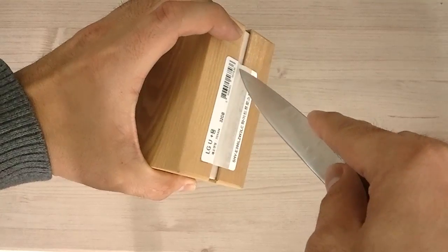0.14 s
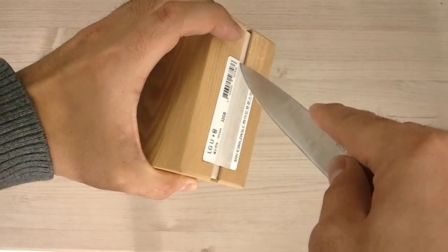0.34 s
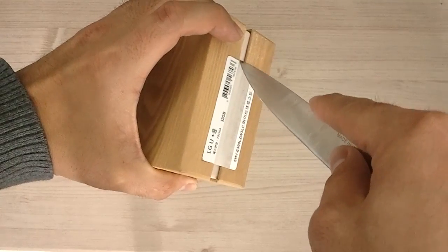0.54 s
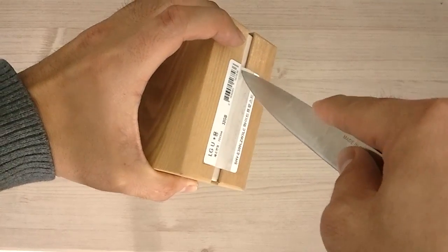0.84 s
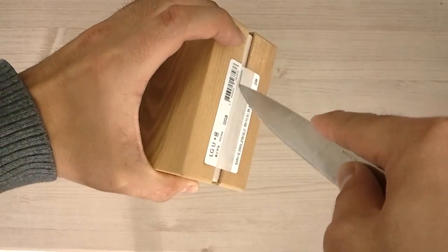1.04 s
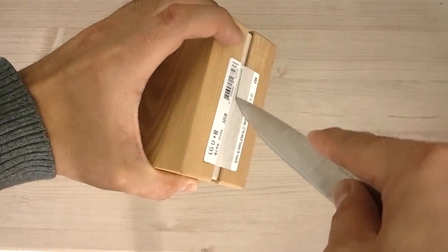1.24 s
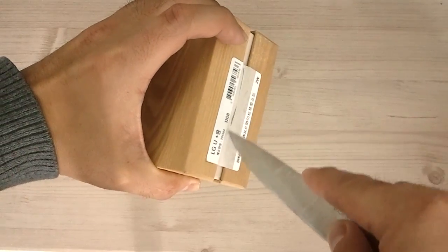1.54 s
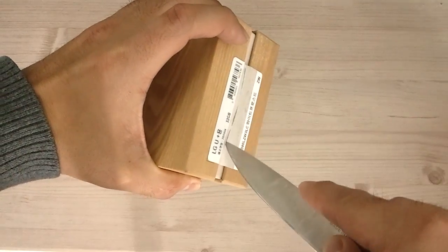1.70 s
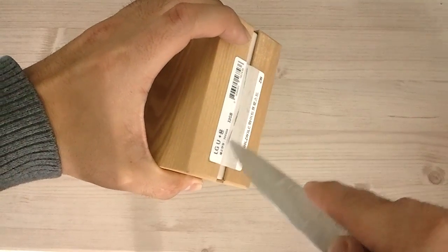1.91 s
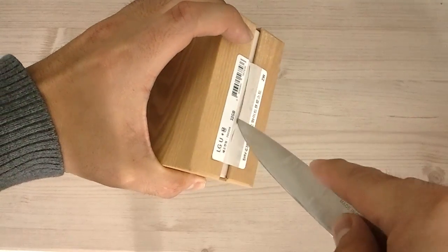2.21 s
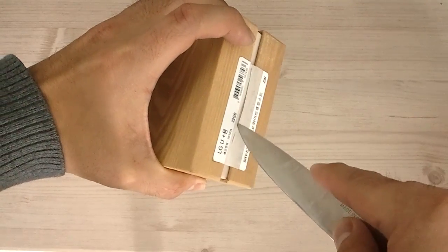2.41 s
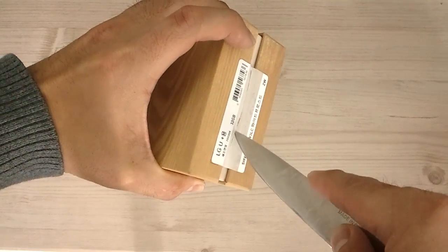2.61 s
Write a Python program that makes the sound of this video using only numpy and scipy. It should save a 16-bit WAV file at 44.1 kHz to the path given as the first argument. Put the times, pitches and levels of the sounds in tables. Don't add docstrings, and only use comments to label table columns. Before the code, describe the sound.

A knife tip slits a paper seal on a small wooden box, ticking, scraping and thumping the table

```python
import sys
import numpy as np
from scipy import signal
from scipy.fft import rfft, irfft, next_fast_len
from scipy.io import wavfile
from scipy.ndimage import uniform_filter1d, map_coordinates

SR = 44100
rng = np.random.default_rng(int(sys.argv[2]) if len(sys.argv) > 2 else 0)


def convert_level_to_amplitude(level_db):
    exponent = np.asarray(level_db, float) / 20
    return 10 ** exponent


def bounce(signal):
    frames = np.transpose(np.atleast_2d(signal))
    limited = np.clip(frames, -1, 1)
    pcm = np.round(limited * 32767).astype(np.int16)
    wavfile.write(sys.argv[1], SR, pcm)


N = 121275
HALF = SR // 40
WINDOW_HZ = np.fft.rfftfreq(2 * HALF, 1 / SR)


def along(points, hz):
    f, v = np.transpose(points)
    return np.interp(np.log(hz + 1), np.log(f + 1), v)


def unit(x):
    return x / np.sqrt(np.mean(x ** 2) + 1e-20)


def wobble(rate):
    knots = rng.standard_normal(int(N * rate / SR) + 4)
    return map_coordinates(knots, [np.arange(N) * rate / SR])


def filtered(x, response):
    m = next_fast_len(N + SR)
    return irfft(rfft(x, m) * response(np.fft.rfftfreq(m, 1 / SR)), m)[..., :N]


def coloured(x, points):
    cepstrum = irfft(np.log(convert_level_to_amplitude(along(points, np.fft.rfftfreq(4096, 1 / SR))) + 1e-6))
    cepstrum[1:2048] *= 2
    cepstrum[2049:] = 0
    h = irfft(np.exp(rfft(cepstrum)))[:1024]
    return signal.fftconvolve(x, h / np.linalg.norm(h))[:N]


def ringing(x, modes):
    def response(f):
        total = 0
        for k, (centre, width, db) in enumerate(modes):
            damping = 1j * f * width
            total = total + (-1) ** k * convert_level_to_amplitude(db) * damping / (centre * centre - f * f + damping)
        return total / np.sqrt(np.mean(abs(total) ** 2))
    return filtered(x, response)


def knife():
    drag, drag_in_box = strokes()
    tear, tear_in_steel, tear_in_box = tears()
    drag_rings_db = -9
    air = drag + tear
    steel = drag * convert_level_to_amplitude(drag_rings_db) + tear_in_steel
    return paper(air) + blade(steel) + box(drag_in_box + tear_in_box + knocks())


def strokes():
    # (time [s], drag level [dB], box share [dB])
    long_cut = [
        (1.04, -76, 0),
        (1.055, -59.5, -7),
        (1.12, -54, -9),
        (1.2, -62, -11.5),
        (1.4, -58, -9),
        (1.5, -59, -6.5),
        (1.54, -54, -9),
        (1.594, -54, -11),
        (1.63, -86, -16),
    ]
    short_cut = [
        (1.658, -63, -2),
        (1.664, -47, -11),
        (1.681, -47.5, -13),
        (1.695, -52, -12.5),
        (1.705, -52, -8),
        (1.719, -58.5, -14.5),
        (1.745, -60.5, -12.5),
        (1.765, -79, -4),
    ]
    flick = [
        (1.794, -77, -23),
        (1.808, -58.5, -7),
        (1.819, -49, -22),
        (1.831, -75, -14),
    ]
    t, air, in_box = np.arange(N) / SR, np.zeros(N), np.zeros(N)
    judder_db = 1.6
    judder = convert_level_to_amplitude(judder_db * (wobble(76) + wobble(300)))
    for stroke in (long_cut, short_cut, flick):
        s, db, share_db = np.transpose(stroke)
        drag = convert_level_to_amplitude(np.interp(t, s, db, -120, -120)) * judder * fibres()
        air += drag
        in_box += drag * convert_level_to_amplitude(np.interp(t, s, share_db))
    return air, in_box


def fibres():
    snaps_per_s, snap_spread_db, rub_db = 3200, 3.5, 0
    snaps = (rng.random(N) < snaps_per_s / SR) * rng.choice([-1, 1], N)
    snaps = snaps * convert_level_to_amplitude(snap_spread_db * rng.standard_normal(N))
    return unit(unit(snaps) + convert_level_to_amplitude(rub_db) * rng.standard_normal(N))


def tears():
    # (time [s], peak level [dB], box share [dB], burst [s], tilt [dB/octave])
    ticks = [
        (0.0389, -48.5, -12.5, 0.00063, 0),
        (0.2529, -33, -49, 0.0013, 6),
        (0.6688, -32, -24.5, 0.0012, 4),
        (1.061, -29.5, -24.5, 0.00046, 4),
        (1.6636, -57, -6, 0.001, -2),
        (2.5848, -53, -19, 0.0008, -1),
        (2.6958, -57, -18, 0.00059, -1),
    ]
    # (time [s], peak level [dB], box share [dB], burst [s], tilt [dB/octave])
    catches = [(0.915, -34, -12, 0.0023, -3.5), (1.0724, -50, -9, 0.0076, -21.5),
               (1.103, -41.5, -12, 0.0017, 3), (1.1677, -38.5, -23, 0.0016, 3.5),
               (1.2276, -45.5, -30, 0.0028, 9.5), (1.262, -43.5, -14, 0.0015, 3.5),
               (1.2866, -41.5, -42, 0.0011, 2), (1.238, -45.5, -17, .001, 0), (1.3142, -38, -22, 0.0022, 1),
               (1.3443, -50, -19, 0.00057, 0), (1.4033, -48, -19, 0.002, -3), (1.51, -47.5, -20, .0015, 7),
               (1.533, -51, -16, 0.0024, -4), (1.7034, -39.5, -41, 0.003, 9.5),
               (1.8085, -40.5, -41, 0.003, 13.5), (0.385, -54.5, -32, 0.0072, -6),
               (2.0163, -55.5, -22, 0.0033, -1), (2.0324, -49, -26, 0.0033, -3),
               (2.2967, -44.5, -28.5, 0.0036, 5), (2.3142, -60.5, -17, 0.0016, -15),
               (2.5562, -40, -24, 0.0021, -8.5)]
    air, steel, in_box = np.zeros((3, N))
    pivot_hz = 5000
    box_tilt, box_pivot_hz = 0.41, 1540
    octaves = np.log2(np.clip(WINDOW_HZ, 2500, 11000) / pivot_hz)
    box_octaves = np.log2(np.clip(WINDOW_HZ, 500, 4000) / box_pivot_hz)
    for rows, lead, ring in ((ticks, 0.08, 0.3), (catches, 0.9, 1)):
        for s, db, share_db, burst, tilt_db in rows:
            spectrum = rfft(volley(burst, lead))
            bright = irfft(spectrum * convert_level_to_amplitude(db + 13.5 + tilt_db * octaves), 2 * HALF)
            thud_db = db + 13.5 + share_db + 2.5 + box_tilt * tilt_db * box_octaves
            i = round(s * SR) - HALF
            air[i:i + 2 * HALF] += bright
            steel[i:i + 2 * HALF] += ring * bright
            in_box[i:i + 2 * HALF] += irfft(spectrum * convert_level_to_amplitude(thud_db), 2 * HALF)
    return air, steel, in_box


def volley(burst, lead):
    u = np.arange(-HALF, HALF) / SR
    v = u / np.clip(burst, .0002, .006) - 1
    noise = rng.standard_normal(len(u)) * np.exp(np.where(v < 0, v / lead, -v / 2.13))
    z = rfft(noise)
    even = irfft(z / np.sqrt(uniform_filter1d(abs(z) ** 2, size=30)), len(u))
    return even / np.linalg.norm(even)


def knocks():
    # (time [s], level [dB], favoured frequency [Hz], reach [octaves])
    blows = [(0.2535, -22.5, 5440, 0.12), (0.6705, -32, 3920, 0.22), (0.6717, -43.5, 950, 0.7),
             (0.9174, -29.5, 3600, 0.36), (0.918, -30, 1000, 1.9), (1.058, -33, 2103, 0.46),
             (1.316, -39, 1982, .3), (1.411, -36, 1000, .4), (1.57, -22, 1720, 0.095),
             (1.59, -28, 1720, 0.12), (1.664, -25, 5040, 0.077), (1.703, -26, 2140, 0.45),
             (1.811, -30.5, 2380, 0.14), (1.814, -31.5, 1990, 0.43), (2.035, -43, 2160, 0.27),
             (2.317, -44, 1000, 0.41), (2.558, -43, 1100, 1.4)]
    force = np.zeros(N)
    for s, db, favoured_hz, reach in blows:
        away = np.log2((WINDOW_HZ + 1) / favoured_hz) / reach
        blow = irfft(np.exp(-.5 * away ** 2), 2 * HALF)
        i = round(s * SR) - HALF
        force[i:i + 2 * HALF] += convert_level_to_amplitude(db) * np.roll(blow, HALF)
    return force


def paper(force):
    # (frequency [Hz], level [dB])
    snap = [(2000, -23), (3400, -24.5), (4200, -7), (4800, 1.5), (5200, -7), (5650, -10), (6300, -11),
            (11500, -41.5)]
    return coloured(force, snap)


def blade(force):
    # (frequency [Hz], width [Hz], level [dB])
    steel_modes = [(3650, 150, -1.5), (4900, 180, -4.5), (5764, 198, -1.5), (6510, 330, -3),
                   (9040, 180, -23), (10100, 290, -33)]
    # (frequency [Hz], width [Hz], level [dB])
    radiation = [(3030, 2800, -12.5), (6200, 7850, -0.5)]
    blade_db = -8
    return convert_level_to_amplitude(blade_db) * ringing(ringing(force, steel_modes), radiation)


def box(force):
    # (frequency [Hz], width [Hz], level [dB])
    wood_modes = [(471, 79, 2), (712, 262, 0.5), (1000, 178, 3.5), (1290, 90, -0.5), (1470, 153, -1),
                  (1720, 248, -1), (2084, 360, 0), (2605, 385, -0.5), (3100, 384, 0), (3690, 300, 0),
                  (4575, 230, 2), (5084, 280, -0.5), (5673, 350, -4.5)]
    # (frequency [Hz], level [dB])
    colour = [(250, -27), (450, 0), (4000, 4), (5800, 10.5), (8000, -65)]
    return coloured(ringing(ringing(force, wood_modes), wood_modes), colour)


def dull_noise():
    wood_top_hz = 510
    return filtered(rng.standard_normal(N), lambda f: 1 / (1 + (f / wood_top_hz) ** 6))


def table():
    return rumble() + shoves()


def rumble():
    # (time [s], level [dB])
    pressure = [(0.0, -47), (.2, -50.5), (0.36, -54.5), (0.49, -53), (0.63, -51.5), (.85, -46),
                (1.031, -45), (1.19, -38), (1.3, -40.5), (1.39, -34), (1.58, -38), (1.639, -41),
                (1.81, -46), (1.979, -53.5), (2.1, -46), (2.25, -56), (2.45, -51.5), (2.75, -54.5)]
    # (frequency [Hz], width [Hz], level [dB])
    table_modes = [(53.5, 39.2, -5.5), (74.6, 39.4, 0), (110, 29, -2.5), (200.15, 16.5, -8),
                   (265.4, 29.6, -17), (365.3, 21.4, -19)]
    s, db = np.transpose(pressure)
    level = convert_level_to_amplitude(np.interp(np.arange(N) / SR, s, db) - 1 + 3.2 * wobble(9.67))
    return level * unit(ringing(ringing(dull_noise(), table_modes), table_modes))


def shoves():
    # (time [s], peak level [dB], pitch [Hz], upper mode [dB], length [s])
    pushes = [(0, -45.5, 78.3, -3.5, 0.018), (.085, -50, 83, -2.5, 0.026), (0.172, -55, 89.3, -2, 0.096),
              (0.246, -48, 77.2, -8, 0.064), (0.324, -43, 80.4, -29, 0.059), (0.393, -49, 92, -8, 0.05),
              (0.501, -47, 82, -11, 0.033), (0.637, -38, 73.5, -19.5, 0.081),
              (0.785, -35.5, 58.5, -43, 0.059), (0.886, -37, 70.2, -19, 0.092),
              (0.915, -26.5, 89.8, -7.5, 0.035), (.94, -28, 73, -21, 0.017), (1.07, -38, 110, -22, 0.024),
              (1.166, -31, 80.5, -11, 0.039), (1.244, -52, 86, -6, 0.025), (1.333, -32.5, 75, -12, 0.018),
              (1.392, -35, 100, -2, 0.017), (1.462, -40, 76, -1.5, 0.029), (1.518, -32.5, 110, -3, 0.052),
              (1.571, -41.5, 110, 0, 0.05), (1.67, -32, 95.7, -6, 0.039), (1.709, -27, 78.6, -11.5, 0.045),
              (1.822, -42.5, 99.7, -1.5, 0.031), (2.028, -46, 82.9, -4, 0.098),
              (2.316, -23, 77.8, -19, 0.053), (2.499, -39, 82.5, -16, 0.094),
              (2.557, -36.5, 100.5, -4, 0.043), (2.688, -43.5, 98.2, -11, 0.05)]
    # (frequency [Hz], width [Hz], level [dB])
    overtones = [(127, 37, 16), (263, 63, -1.5), (410, 30, -20), (440, 40, -23)]
    sag, sag_s, low_t60_s = 0.25, 0.025, 0.08
    upper_hz, upper_rise_s, upper_t60_s = 203.65, 0.0039, 0.097
    octave_db = -24
    third_hz, third_db, third_t60_s = 274.8, -33, 0.51
    t, out = np.arange(N) / SR, np.zeros(N)
    rattle = convert_level_to_amplitude(-23) * unit(ringing(dull_noise(), overtones))
    for (s, db, hz, upper_db, length), turn in zip(pushes, rng.random((len(pushes), 3))):
        u = np.clip(t - s, 0, None)
        swell = np.sin(np.pi / 2 * np.clip(2 * u / length, 0, 1)) ** 2
        swell *= convert_level_to_amplitude(-60 * np.clip(u - 0.85 * length, 0, None) / low_t60_s)
        cycles = hz * (u + sag * sag_s * (1 - np.exp(-u / sag_s)))
        out += convert_level_to_amplitude(db) * swell * (np.sin(2 * np.pi * (cycles + turn[0])) + rattle)

        knock = 1 - np.exp(-u / upper_rise_s)
        knock *= convert_level_to_amplitude(-60 * np.clip(u - 0.8 * length, 0, None) / upper_t60_s)
        upper = np.sin(2 * np.pi * (upper_hz * u + turn[1]))
        upper += convert_level_to_amplitude(octave_db) * np.sin(4 * np.pi * upper_hz * u)
        out += convert_level_to_amplitude(db + upper_db) * knock * upper

        fade = convert_level_to_amplitude(db + third_db - 60 * u / third_t60_s) * np.clip(u / length, 0, 1) ** 2
        out += fade * np.sin(2 * np.pi * (third_hz * u + turn[2]))
    return out


def room(x):
    # (delay [s], level [dB])
    walls = [(.0013, -26.5), (0.0116, -13), (0.013, -19.5), (.027, -17)]
    # (frequency [Hz], t60 [s])
    decay = [(300, 0.34), (2000, 0.25), (5000, 0.34), (10000, 0.24)]
    room_db = -8.5
    out = x + sum(convert_level_to_amplitude(db) * np.pad(x, (round(s * SR), 0))[:N] for s, db in walls)
    step = SR // 8
    for i in range(0, N, step):
        hz, t, z = signal.stft(rng.standard_normal(SR // 2), SR, nperseg=256)
        fading = z * convert_level_to_amplitude(-60 * t / along(decay, hz)[:, None])
        tail = signal.istft(fading, SR, nperseg=256)[1]
        late = np.pad(x[i:i + step], (200, 0))
        wet = signal.fftconvolve(late, tail / np.linalg.norm(tail))[:N - i]
        out[i:i + len(wet)] += convert_level_to_amplitude(room_db) * wet
    return out


def background():
    # (frequency [Hz], rms level [dB])
    partials = [(90, -57.5), (150, -82), (270, -76.5), (368, -85)]
    # (frequency [Hz], width [Hz], level [dB])
    far_modes = [(29.4, 42, 0)]
    # (frequency [Hz], level [dB])
    hiss_colour = [(250, -21.5), (380, -7), (600, -16), (3400, -13.5), (6300, -15), (7500, -30),
                   (9200, -32.5), (11000, -46.5)]
    far_db, hiss_db = -57.5, -69.5
    t, hum = np.arange(N) / SR, np.zeros(N)
    for hz, db in partials:
        level = np.sqrt(2) * convert_level_to_amplitude(db + 1.3 * wobble(6.4))
        hum += level * np.sin(2 * np.pi * hz * t + 0.63 * wobble(14))
    far = convert_level_to_amplitude(far_db) * unit(ringing(ringing(rng.standard_normal(N), far_modes), far_modes))
    hiss_level = convert_level_to_amplitude(hiss_db + 0.3 * wobble(8.3))
    hiss = unit(filtered(rng.standard_normal(N), lambda f: convert_level_to_amplitude(along(hiss_colour, f))))
    return hum + far + hiss_level * hiss


def scene():
    return (room(knife()) + table() + background())[None]


def roll_off(x):
    return signal.sosfilt(signal.butter(12, 11200, fs=SR, output="sos"), x)


def record(dry):
    # (frequency [Hz], level [dB])
    port = [(6400, -1.5), (6950, -1), (7500, -5.5), (8050, -13.5), (9000, -0.5), (9800, -2), (10350, -3),
            (11300, -13)]
    offset = -0.0045
    return roll_off(filtered(dry, lambda f: convert_level_to_amplitude(along(port, f))) + offset)


dry = scene()
out = record(dry)
bounce(out)
```